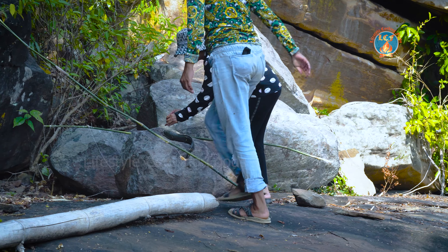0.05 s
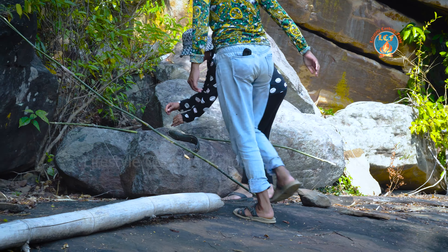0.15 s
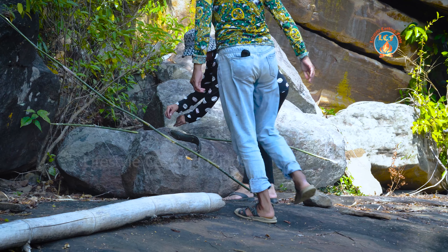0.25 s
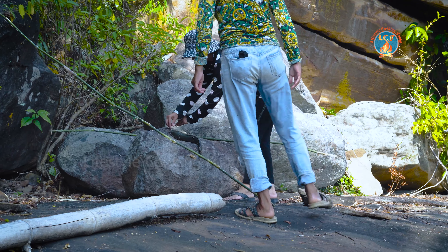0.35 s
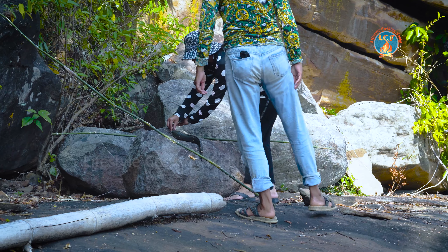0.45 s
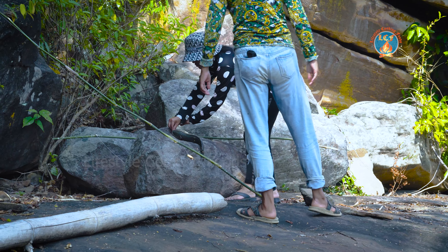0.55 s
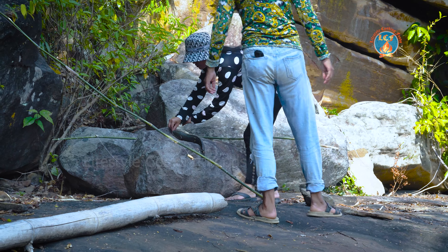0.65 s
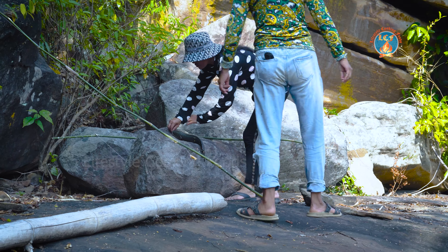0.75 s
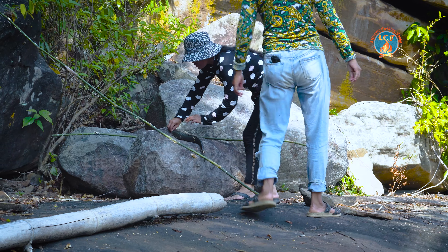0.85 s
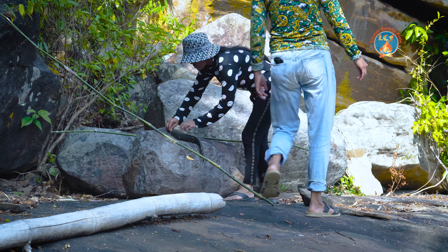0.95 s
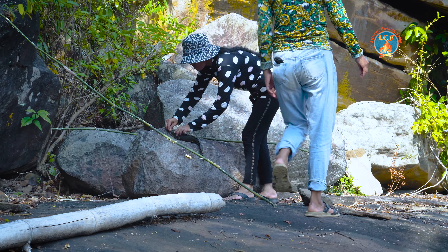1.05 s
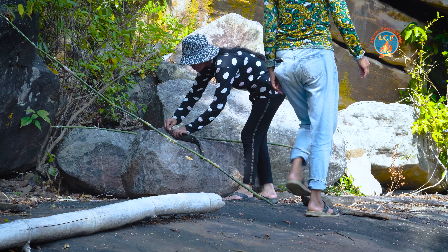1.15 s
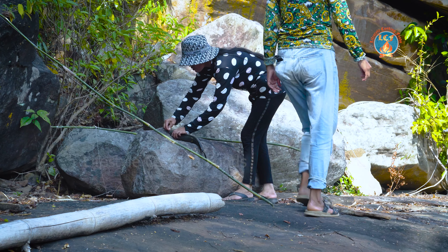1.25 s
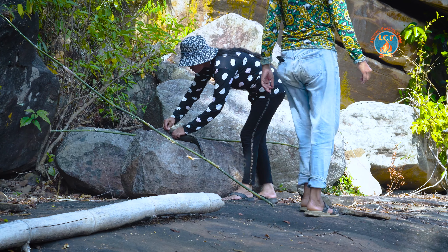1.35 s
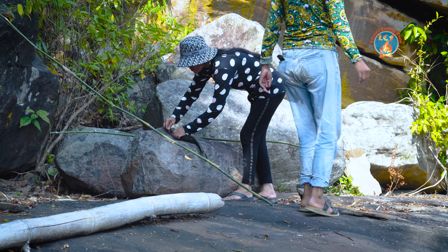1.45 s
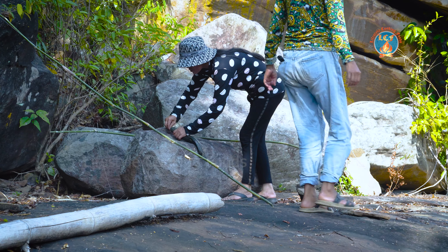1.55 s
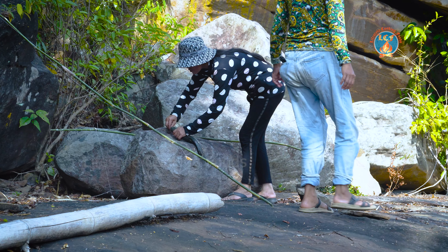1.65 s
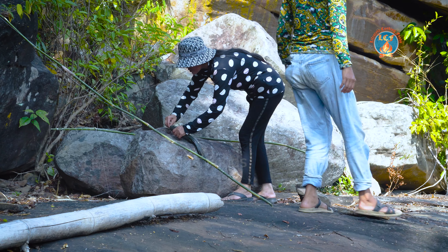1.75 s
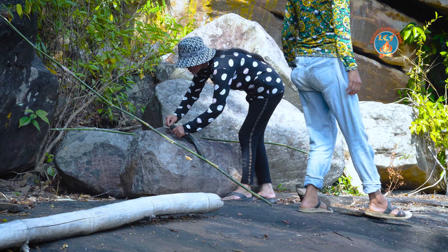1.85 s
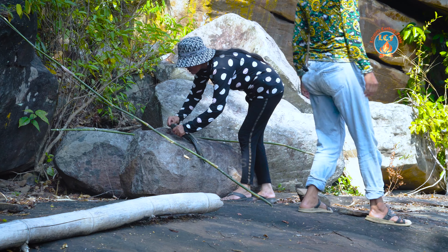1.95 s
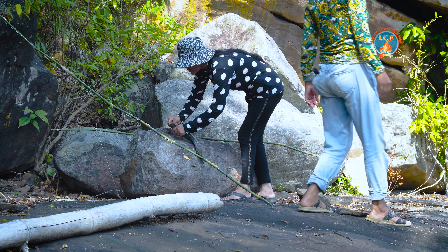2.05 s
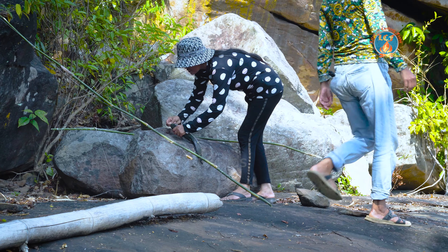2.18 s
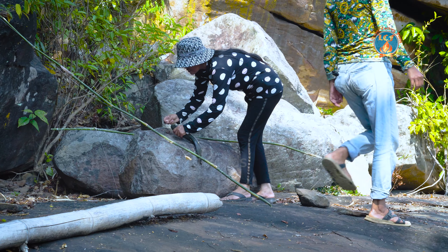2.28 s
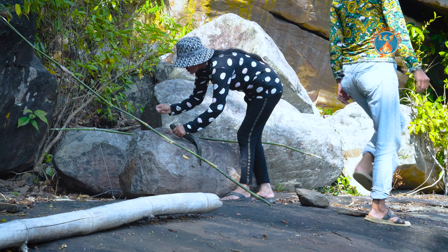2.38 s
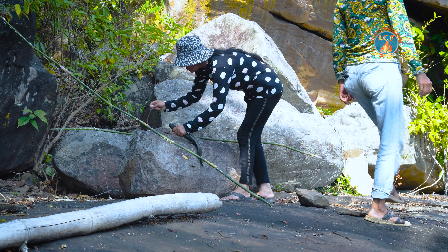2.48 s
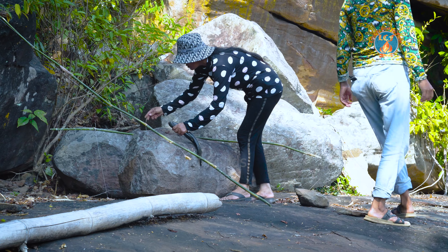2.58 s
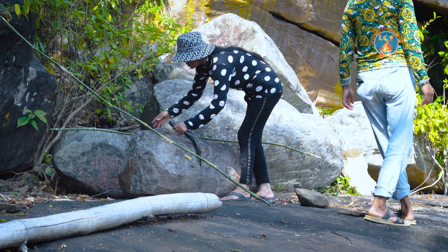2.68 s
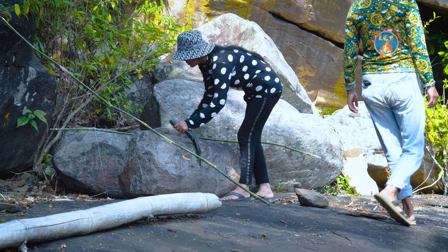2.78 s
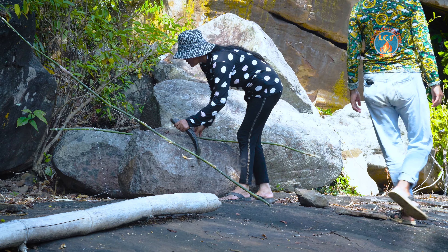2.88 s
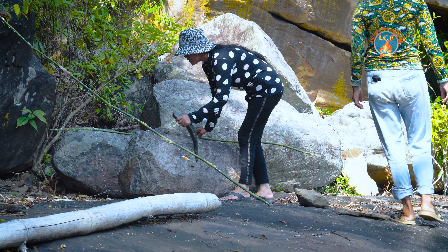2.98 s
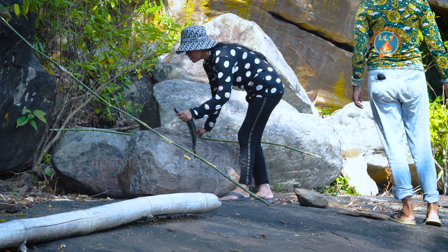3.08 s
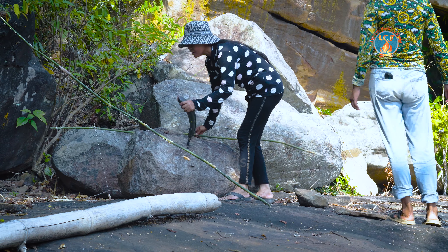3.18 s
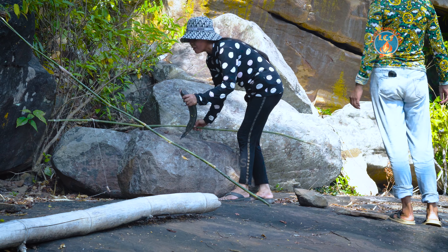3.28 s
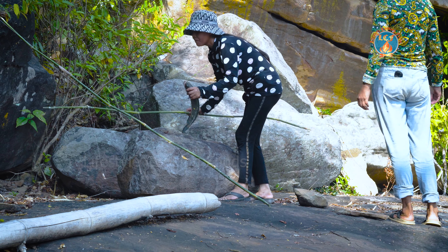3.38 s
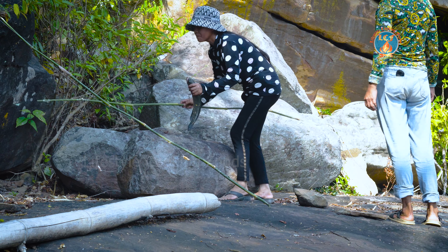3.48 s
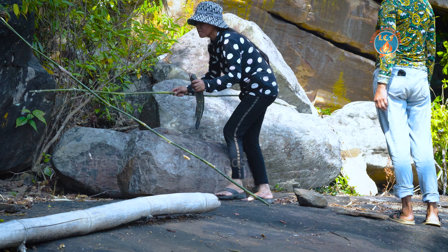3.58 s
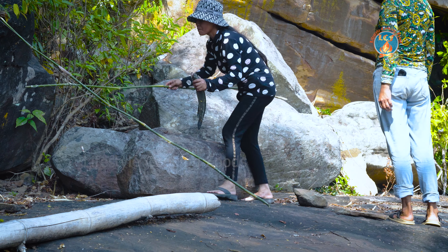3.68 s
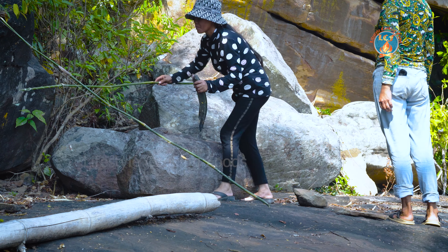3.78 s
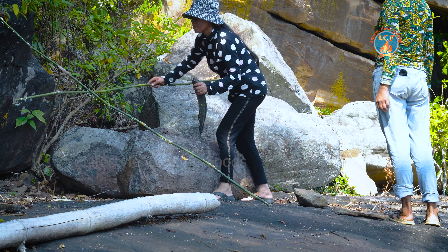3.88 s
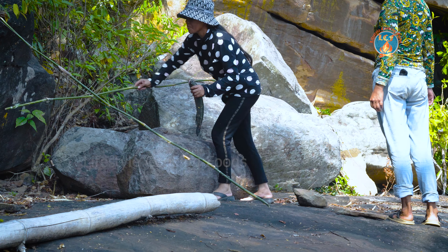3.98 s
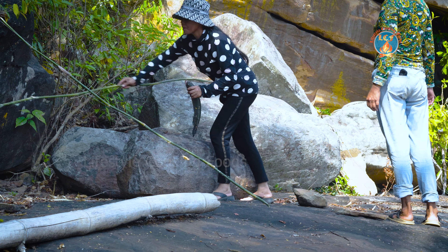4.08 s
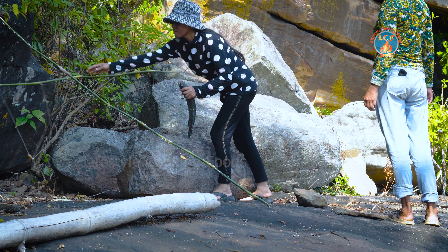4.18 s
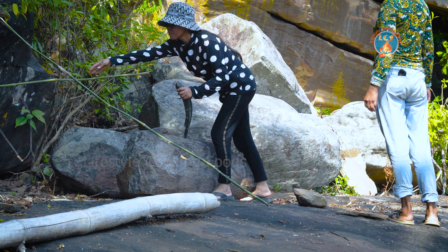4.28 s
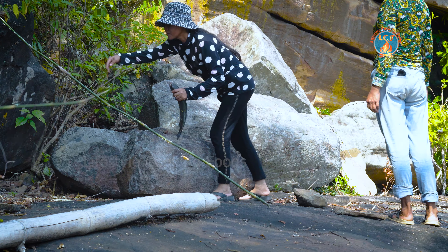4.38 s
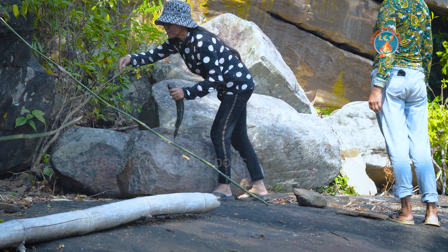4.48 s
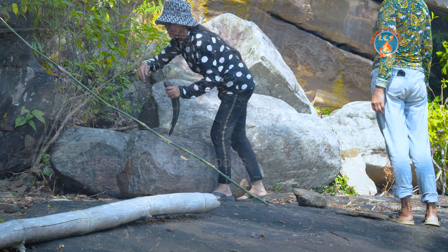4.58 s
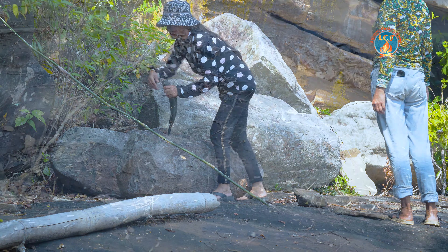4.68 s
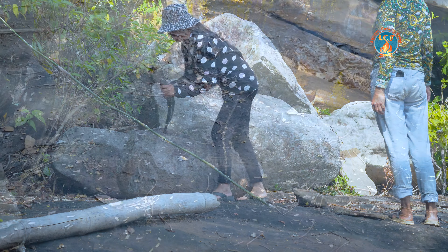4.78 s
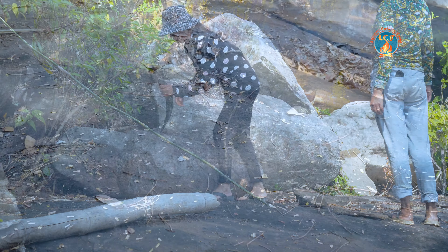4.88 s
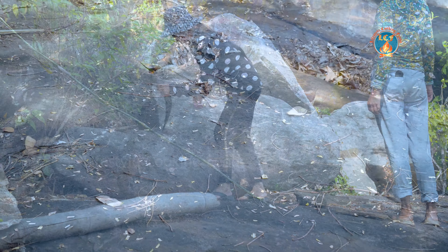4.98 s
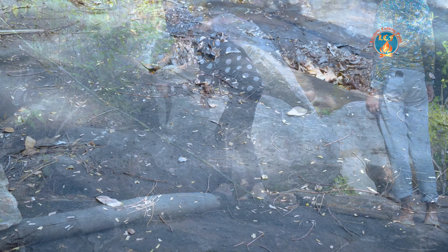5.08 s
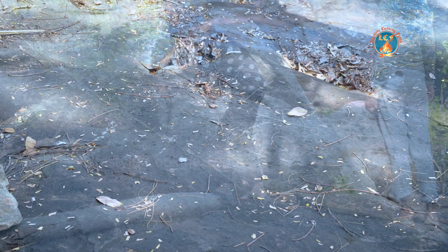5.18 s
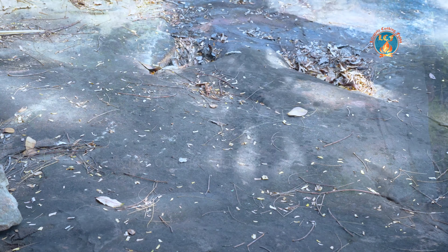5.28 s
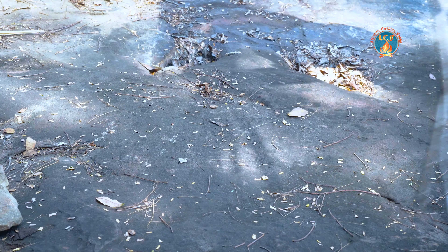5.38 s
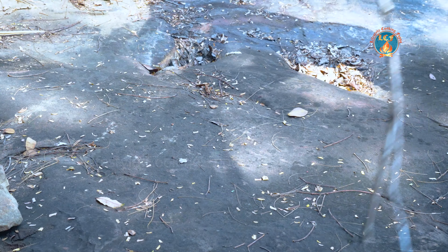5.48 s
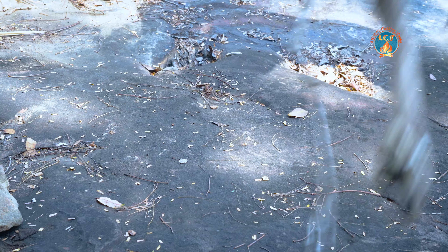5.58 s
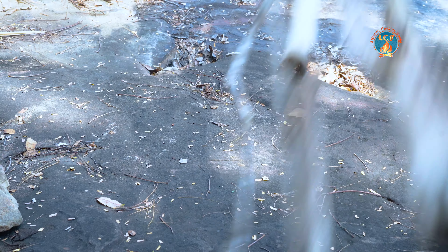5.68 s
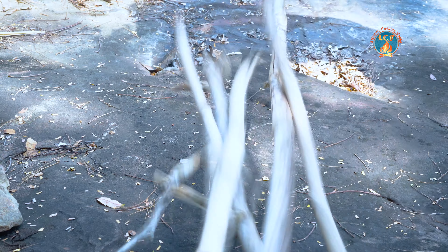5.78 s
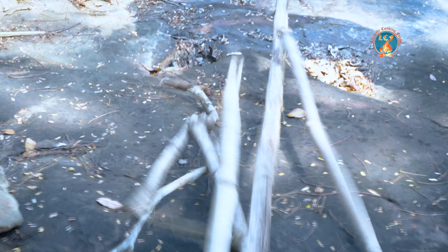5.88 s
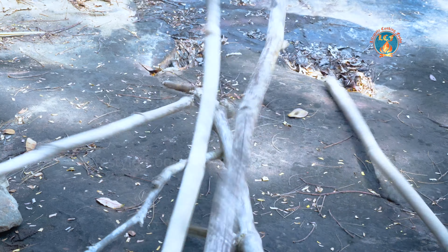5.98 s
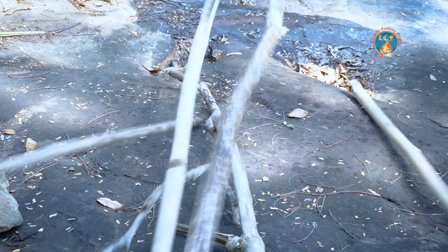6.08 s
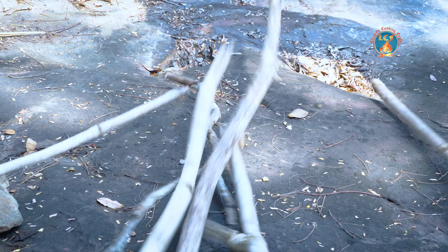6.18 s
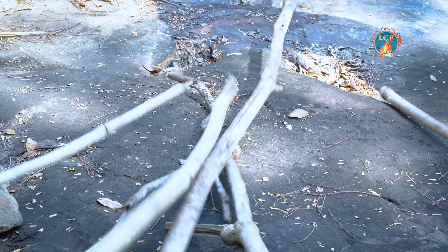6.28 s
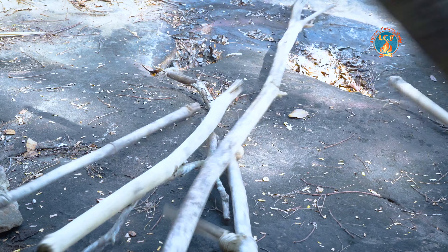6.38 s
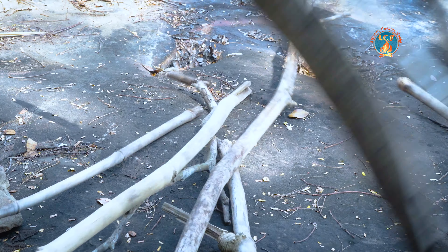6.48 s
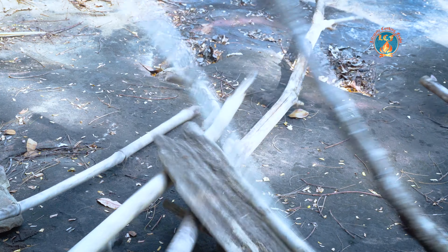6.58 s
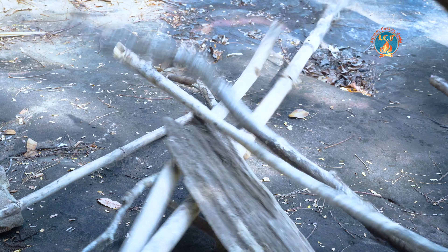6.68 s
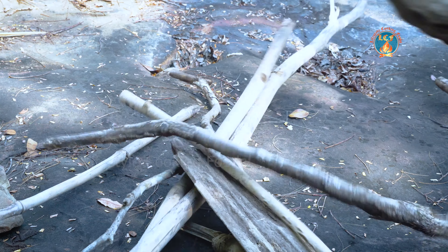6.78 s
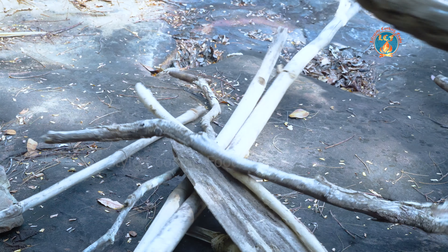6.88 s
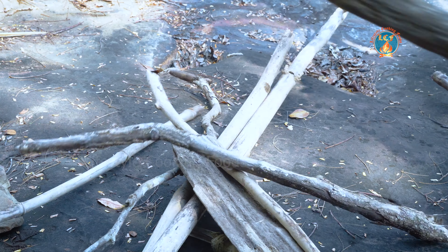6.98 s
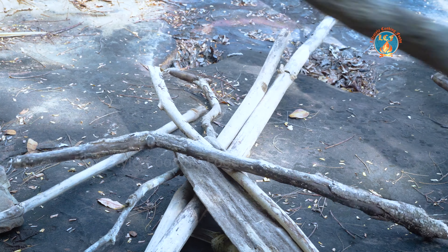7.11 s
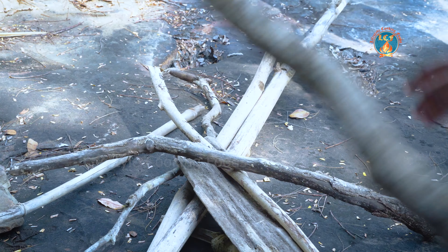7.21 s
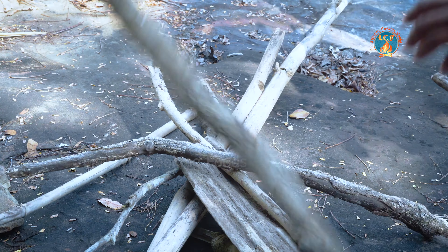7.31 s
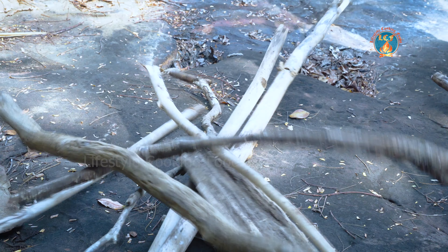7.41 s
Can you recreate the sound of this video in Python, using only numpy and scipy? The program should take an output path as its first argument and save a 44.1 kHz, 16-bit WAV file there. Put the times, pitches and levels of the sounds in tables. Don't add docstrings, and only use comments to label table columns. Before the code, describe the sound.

Among boulders outdoors, a soft far hiss carries sharp bird chips, small whistles and faint ticks. A cut cane is thrown aside, knocking and ringing briefly as its leaves swish, then it is cut off. After a short lull, dry branches clatter loudly onto rock, close to a stereo microphone, and heavier boughs follow.

```python
import sys
import numpy as np
from scipy import signal
from scipy.fft import rfft, irfft
from scipy.io import wavfile

SR = 44100
rng = np.random.default_rng(int(sys.argv[2]) if len(sys.argv) > 2 else 0)


def store_pcm(level_fs):
    pcm = np.round(np.clip(level_fs, -1, 1) * 32767).astype(np.int16)
    wavfile.write(sys.argv[1], SR, np.atleast_2d(pcm).T)


def rack_gain(trim_db):
    fader = np.asarray(trim_db, float)
    return 10 ** (fader / 20)


N = 328545
SCENE_CHANGE_S = 4.952


def at_hz(points, hz):
    points_hz, values = np.transpose(points)
    return np.interp(np.log(hz), np.log(points_hz), values)


def shaped(noise, points):
    length = noise.shape[-1]
    hz = np.maximum(np.fft.rfftfreq(length, 1 / SR), 1)
    out = irfft(rfft(noise) * rack_gain(at_hz(points, hz)), length)
    return out / np.sqrt(np.mean(out ** 2))


def drift(rate_hz):
    knots = rng.standard_normal(int(N / SR * 40) + 2)
    return 1.22 * np.interp(np.arange(N) / SR * min(rate_hz, 39), np.arange(len(knots)), knots)


def ring(clicks, hz, t60):
    r = rack_gain(-60 / (t60 * SR))
    w = 2 * np.pi * hz / SR
    return signal.lfilter([0, np.sin(w)], [1, -2 * r * np.cos(w), r * r], clicks + 1e-18)


def add(out, start_s, sound):
    i = round(start_s * SR)
    out[..., i:i + sound.shape[-1]] += sound[..., :max(N - i, 0)]


def echoes(x, t60, wet_db, early_db):
    t = np.arange(int(t60 * SR)) / SR
    tail = rng.standard_normal((2, SR))[:, :len(t)] * rack_gain(-60 * t / t60)
    tail = tail * (1 + rack_gain(early_db) * np.exp(-t / 0.017)) * np.minimum(t / 0.00067, 1)
    tail = tail / np.sqrt(np.sum(tail ** 2, 1, keepdims=True))
    return rack_gain(wet_db) * signal.fftconvolve(x[None], tail, axes=1)[:, :N]


# (start_s, peak_db, main_pitch_hz, hardness_db: crack over 4 kHz)
ARMFUL = [(5.592, -33.5, 1305, -43), (5.618, -35, 824, -23), (5.667, -32.5, 2750, -1),
          (5.678, -16.5, 1310, -6.5), (5.701, -18, 1767, 0.5), (5.71, -15, 1490, -9),
          (5.724, -13, 2360, -14), (5.735, -12, 2460, -12), (5.751, -17, 2470, -40),
          (5.757, -11.5, 1737, -38), (5.822, -15, 2330, -2.5), (5.837, -8, 1250, -14),
          (5.863, -12.5, 1980, -11), (5.877, -13, 1065, -10), (5.889, -13.5, 1380, -4),
          (5.9, -12, 1940, -9), (5.915, -15, 1760, -2.5), (5.928, -10, 1690, -9), (5.941, -13.5, 2680, -7),
          (5.946, -12.5, 2400, -7), (5.961, -15, 1424, -11), (5.977, -10.5, 1507, -10),
          (6.012, -16.5, 1590, -11), (6.023, -38, 1600, 7), (6.046, -25, 1053, -11),
          (6.089, -10, 1681, -14), (6.121, -24, 964, -6), (6.16, -19.5, 1570, -13)]
# (start_s, peak_db, main_pitch_hz, hardness_db)
BOUGHS = [(6.22, -8, 1880, -17), (6.265, -10.5, 1620, -22), (6.28, -9.5, 1320, -16),
          (6.3, -9.5, 1300, -11.5), (6.314, -16, 783, -12), (6.327, -9, 1600, -14), (6.37, -14, 1290, -42),
          (6.394, -23.5, 1000, -13), (6.447, -20.5, 1995, -7.5), (6.483, -11.5, 1620, -26),
          (6.524, -7.5, 1302, -11.5), (6.575, -15.5, 1106, -40), (6.595, -27.5, 1700, 2),
          (6.642, -17, 1250, -13), (6.668, -11, 2330, -12), (6.676, -14.5, 1410, -4.5),
          (6.699, -11.5, 927, -7.5), (6.717, -11, 1343, -12.5), (6.723, -12.5, 2780, -5.5),
          (6.758, -8.5, 2410, -15), (6.804, -21.5, 3100, -6.5), (6.824, -10.5, 1358, -29),
          (6.853, -11, 1332, -4), (6.898, -21, 1397, -12), (6.945, -21.5, 1360, -17),
          (7.035, -32.5, 1390, -12), (7.084, -35, 1357, -19), (7.116, -23.5, 2776, -3.5),
          (7.409, -7.5, 896, -22.5), (7.439, -17.5, 980, -10.5)]


def blows():
    rebound_s, loss_db, duller_db = .01, 7.5, 15.5
    first = np.vstack([ARMFUL, BOUGHS])
    chance = rng.uniform(.7, 1.3, (len(first), 1))
    return np.vstack([first, first + chance * [rebound_s, -loss_db, 0, -duller_db]])


def thud(db, pitch):
    t = np.arange(SR // 9) / SR
    lows = sum(np.sin(2 * np.pi * (low + 130 * p) * t) for low, p in zip((330, 420), pitch))
    return rack_gain(db - 4.0) * lows * rack_gain(-60 * t / 0.094) * (1 - np.exp(-t / 0.0049))


# (pitch_hz, level_db)
WOOD = [(350, -63), (600, -14), (900, -5.5), (1400, 0.5), (2200, 2.5), (3200, 3), (4500, 0.5)]


def stick(hz, crack_db, chance, hiss):
    t = np.arange(SR // 9) / SR
    pitch, size, side, late = chance
    others = 600 * 2 ** (3.0 * (np.arange(22) + pitch) / 22)
    octaves = np.log2(others / hz)
    colour_db = .5 * (crack_db + 16.0) * np.clip(octaves, 0, 1.5) - 6.6 * np.abs(octaves)
    pitches = np.append(hz, others)[:, None]
    t60 = np.append(.075, 0.061 * (1200 / others) ** .5)[:, None]
    heights = rack_gain(np.append(-5, at_hz(WOOD, others) - 8 - 8 * size + colour_db)) * (-1) ** np.arange(23)
    age = np.maximum(t - np.append(0, 0.00243 * late ** 4)[:, None], 0)
    modes = heights[:, None] * np.sin(2 * np.pi * pitches * age) * rack_gain(-60 * age / t60)
    modes[0] += rack_gain(-19.0) * np.sin(2 * np.pi * .97 * hz * t) * rack_gain(-60 * t / 0.24)
    leaning = np.append(0, 0.66 * (2 * side - 1))
    ringing = np.array([1 + leaning, 1 - leaning]) @ modes
    snap = rack_gain(-5.5) * np.sin(2 * np.pi * 1.59 * hz * t) * rack_gain(-60 * t / 0.0059)
    crack = hiss[:, :len(t)]
    crack = (crack + .5 * crack[0]) * rack_gain(crack_db - 2.0)
    crack = crack * (rack_gain(-60 * t / 0.0077) + 0.38 * rack_gain(-60 * t / 0.085))
    return ringing + snap + crack


# (pitch_hz, level_db per Hz)
CRACK = [(3000, -4), (5000, 12), (8000, 5), (12000, 4), (16000, -2.5)]
# (start_s, left_minus_right_db)
BRANCH_PAN = [(5.6, -6.5), (5.75, -1.5), (7.05, -2), (7.1, -11.5), (7.4, -5)]
# (start_s, level_db)
BUTTS = [(5.679, -26), (5.696, -25), (5.77, -29), (5.847, -30), (5.954, -35), (6.315, -17.5), (6.338, -26),
         (6.369, -27), (6.587, -27), (6.642, -16.5), (6.699, -23), (6.881, -38), (6.917, -28)]


def branches():
    out, thuds = np.zeros((2, N)), np.zeros(N)
    hits = blows()
    chances = rng.random((len(hits), 4, 22))
    hiss = shaped(rng.standard_normal((2, SR)), CRACK)
    for k, ((start_s, db, hz, crack_db), chance) in enumerate(zip(hits, chances)):
        pan_db = np.interp(start_s, *np.transpose(BRANCH_PAN))
        sides = rack_gain([[pan_db / 2], [-pan_db / 2]])
        fresh_hiss = np.roll(hiss, 397 * k, axis=1)
        add(out, start_s, rack_gain(db) * sides * stick(hz, crack_db, chance, fresh_hiss))
        add(thuds, start_s, thud(-39.5 + 0.37 * (db + 16.5), chance[0]))
    for (start_s, db), pitch in zip(BUTTS, rng.random((len(BUTTS), 2))):
        add(thuds, start_s, thud(db, pitch))
    return signal.sosfilt(signal.butter(3, 520, "high", fs=SR, output="sos"), out) + thuds


def spell(start_s, hold_s):
    attack_s, fade_db_per_s = .015, 250
    t = np.arange(N) / SR - start_s
    return np.clip(t / attack_s, 0, 1) * rack_gain(-fade_db_per_s * np.maximum(t - hold_s, 0))


# (start_s, hold_s, clatter_db, rustle_share_db)
RATTLES = [(4.68, 0.24, -44.5, -10), (5.562, 0.057, -53.5, 0), (5.68, 0.067, -27.5, -13.5),
           (5.819, 0.13, -22, -6), (5.992, 0.25, -34, -6.5), (6.288, 0.037, -20.5, -9),
           (6.355, 0.22, -34.5, -12), (6.678, 0.22, -25, -14), (6.893, 0.11, -44, -21),
           (7.088, 0.031, -43.5, 0), (7.41, .04, -33, -18)]


def clatter():
    spells = np.array([rack_gain(db) * spell(start_s, hold_s) for start_s, hold_s, db, share_db in RATTLES])
    level = spells.sum(0)
    rustle = rack_gain(np.array(RATTLES)[:, 3]) @ spells / (level + 1e-12)
    sizes = rack_gain(3.14 * np.minimum(rng.exponential(1, N), 4)) * rng.choice([-1, 1], N)
    knocks_per_s = 2500 * rack_gain(4 * drift(30))
    knocks = sizes * (rng.random(N) < knocks_per_s / SR)
    knocks = knocks / np.sqrt(np.mean(knocks ** 2)) * level
    dealt = rng.integers(0, 26, N)
    out = np.zeros((2, N))
    for k, hz in enumerate(np.geomspace(450, 4600, 26)):
        lean = 0.32 * (-1) ** k
        rings = ring(knocks * (dealt == k), hz, 0.056 * (1200 / hz) ** 1.54)
        out += np.outer([1 + lean, 1 - lean], rack_gain(at_hz(WOOD, hz) - 14.5) * rings)
    shake = np.sqrt(signal.lfilter([.004], [1, -.996], knocks ** 2) + 0.22 * level ** 2)
    bits = (rng.random((2, N)) < 35 / SR) * rng.random((2, N))
    specks = 1 + 6.6 * signal.lfilter([1], [1, -.97], bits)
    return out + rustle * shake * specks * shaped(rng.standard_normal((2, N)), CRACK)


# (start_s, peak_db, favoured_pitch_hz: modes near the spot struck)
CANE = [
    (4.684, -30, 1800),
    (4.711, -8, 2280),
    (4.715, -10, 2000),
    (4.728, -12, 890),
    (4.737, -15, 1600),
    (4.81, -23.5, 950),
    (4.837, -17.5, 3300),
    (4.841, -10.5, 2510),
    (4.852, -13, 935),
    (4.889, -29.5, 1600),
]
# (pitch_hz, level_db, t60_s: the ring's t60 is this capped at 0.22 s, times 0.65)
CANE_MODES = [(619, -12.5, 0.25), (933, -7, 0.36), (1088, -4, 0.14), (1418, 0, 0.1), (1608, 0, 0.36),
              (1870, -11.5, 0.32), (2013, -3, 0.1), (2180, -18, 5.0), (2520, -9.5, 0.24), (2702, 2, 0.04),
              (3300, -34, 0.22), (3850, -13, 0.13), (4390, -35, 0.13), (4700, -36, 0.091)]
# (start_s, level_db)
LEAVES = [
    (4.6, -54.5),
    (4.66, -44.5),
    (4.685, -34.5),
    (4.725, -21.5),
    (4.76, -30),
    (4.82, -38.5),
    (4.845, -33.5),
    (4.895, -32),
    (4.955, -34),
]
# (pitch_hz, level_db per Hz)
LEAF_HISS = [(800, -13), (2000, 5.5), (4000, -1.5), (9000, -3), (16000, -2.5)]


def cane():
    out = np.zeros((2, N))
    start_s, peak_db, spot_hz = np.transpose(CANE)
    at = [round(s * SR) for s in start_s]
    age = np.arange(900)
    rough = np.diff(rng.standard_normal(901)) * (np.exp(-age / 200) + 3 * np.exp(-age / 25))
    for hz, level_db, t60 in CANE_MODES:
        off_spot_db = 14.0 * np.abs(np.log2(hz / spot_hz))
        clicks = np.zeros(N)
        clicks[at] = rack_gain(peak_db + level_db - 6.0 - off_spot_db + 3.7 * rng.standard_normal(len(at)))
        rings = ring(signal.oaconvolve(clicks, rough)[:N], hz, 0.65 * min(t60, .22))
        drive = np.abs(np.exp(-2j * np.pi * hz / SR * age) @ rough).clip(2)
        out += rings / drive * rack_gain([[1.6], [-1.6]])
    leaf_s, leaf_db = np.transpose(LEAVES)
    swish = rack_gain(np.interp(np.arange(N) / SR, leaf_s, leaf_db, left=-120) + 1.25 * drift(39))
    noise = rng.standard_normal((2, N))
    out += swish * shaped(noise + 0.19 * noise[0], LEAF_HISS)
    return out * (np.arange(N) < SCENE_CHANGE_S * SR)


# (start_s, peak_db, centre_hz, t60_s)
TICKS = [(.541, -54, 7000, 0.022), (.93, -53.5, 4460, 0.14), (1.385, -51.5, 1210, 0.45),
         (1.57, -55, 4000, .08), (2.185, -48.5, 1800, 0.14), (2.79, -49, 1670, 0.085),
         (2.912, -46.5, 4820, 0.015), (3.195, -42.5, 1700, 0.067), (3.8, -58, 5000, .03),
         (4.047, -37, 2720, 0.013), (4.047, -45, 6400, 0.0081), (6.641, -35, 221, 0.099),
         (3.209, -55, 3500, 0.99), (4.97, -58, 2800, 1), (5.13, -58.5, 2940, 0.96),
         (5.26, -51.5, 9000, .01), (5.442, -59.5, 4470, 1), (5.953, -39.5, 151, 0.41),
         (4.978, -42.5, 327, 0.078), (5.288, -39, 830, 0.16)]


def ticks():
    out = np.zeros((2, N))
    t = np.arange(SR // 2) / SR
    for start_s, db, hz, t60 in TICKS:
        noise = rng.standard_normal((2, len(t)))
        band = signal.butter(2, [hz * 0.58, hz * 1.66], "band", fs=SR, output="sos")
        tick = signal.sosfilt(band, noise + 3.55 * noise[0])
        add(out, start_s, rack_gain(db) * tick * rack_gain(-60 * t / max(t60, .005)))
    return out


# (start_s, level_db)
CHIPS = [
    (0.002, -27.5),
    (0.633, -27.5),
    (1.395, -28.5),
    (2.227, -25.5),
    (3.159, -27.5),
    (3.62, -31),
]


def chips():
    top_hz, end_hz, length_s = 7650, 4370, 0.0061
    dry = np.zeros(N)
    t = np.arange(int(length_s * SR)) / (length_s * SR)
    hz = top_hz + (end_hz - top_hz) * t ** 1.225
    chip = np.sin(2 * np.pi * np.cumsum(hz) / SR) * np.sin(np.pi * t ** 0.74)
    for start_s, db in CHIPS:
        add(dry, start_s, rack_gain(db) * chip)
        add(dry, start_s + .024, rack_gain(db - 8) * chip[:len(chip) * 2 // 3])
    return echoes(dry, .5, wet_db=0, early_db=11)


# (start_s, length_s, from_hz, to_hz, level_db)
NOTES = [(1.617, 0.066, 2890, 2410, -53), (1.648, 0.046, 7000, 6000, -51), (1.97, 0.043, 6600, 6080, -53),
         (1.994, 0.086, 6220, 4390, -38), (2.073, 0.099, 4430, 5150, -42),
         (2.691, 0.096, 2140, 1840, -56.5), (2.925, 0.06, 3860, 4800, -37.5),
         (3.0, 0.034, 3920, 5300, -40.5), (3.056, 0.038, 4040, 5210, -42.5),
         (3.123, 0.028, 4100, 4700, -45), (3.107, 0.072, 3000, 2490, -54.5), (3.29, .1, 2860, 2507, -56.5),
         (3.467, .11, 4060, 4010, -60.5), (3.633, 0.074, 4040, 4020, -63),
         (3.778, 0.053, 5100, 5050, -58.5), (3.87, .06, 5060, 5020, -64), (3.9, 0.17, 4530, 4505, -59.5),
         (4.26, 0.04, 4580, 4520, -60), (4.35, 0.04, 4560, 4500, -65), (4.29, 0.058, 1244, 1160, -53),
         (4.353, 0.024, 1640, 1570, -51)]


def whistles():
    attack_s, release_s = 0.0045, .008
    dry = np.zeros(N)
    waver = 1 + 0.0021 * drift(39)
    for start_s, length_s, from_hz, to_hz, db in NOTES:
        t = np.arange(0, length_s, 1 / SR)
        edges = np.clip(np.minimum(t / attack_s, (length_s - t) / release_s), 0, 1)
        hz = to_hz + (from_hz - to_hz) * np.exp(-3.0 * t / length_s)
        tone = np.sin(2 * np.pi * np.cumsum(hz * waver[:len(t)]) / SR)
        add(dry, start_s, rack_gain(db) * edges * tone)
    return dry * rack_gain([[-5], [-8]]) + echoes(dry, 0.63, wet_db=4.5, early_db=-19)


# (pitch_hz, level_db per Hz)
AIR = [(30, -5), (90, -5.5), (170, -11), (350, -5.5), (1100, -3.5), (3300, -10), (6500, -10.5),
       (16500, -9.5)]
# (pitch_hz, likeness from 0 to 1)
AIR_LIKENESS = [(60, 0.66), (150, 0.4), (400, 0.6), (1000, 0.3), (2400, 0.29), (6000, 0.13), (15000, 0)]


def air():
    mid, side = rfft(shaped(rng.standard_normal((2, N)), AIR))
    hz = np.maximum(np.fft.rfftfreq(N, 1 / SR), 1)
    alike = np.clip(at_hz(AIR_LIKENESS, hz), 0, 1)
    both = np.sqrt(1 + alike) * mid + np.sqrt(1 - alike) * side * [[1], [-1]]
    bass = 1 / (1 + (hz / 55) ** 4)
    gusty = irfft(both * bass, N) * rack_gain(2.4 * drift(4)) + irfft(both * (1 - bass), N)
    return rack_gain(-53) * gusty * rack_gain([[.4], [-.4]])


def scene():
    wood = branches() + cane() + clatter() * rack_gain([[-.7], [.7]])
    wood = signal.sosfilt(signal.butter(4, 300, "high", fs=SR, output="sos"), wood)
    near = wood + echoes(wood.mean(0), 0.15, wet_db=-14.5, early_db=-33)
    near[:, int(SCENE_CHANGE_S * SR):int(5.3 * SR)] = 0
    return near + ticks() + chips() + whistles() + air()


def band_limit(x):
    return signal.sosfilt(signal.butter(12, 17010, fs=SR, output="sos"), x)


def record(dry):
    rounded = 0.91 * np.tanh(dry / 0.98)
    top_cut = signal.ellip(12, 1, 60, 15760, fs=SR, output="sos")
    mix = signal.sosfilt(top_cut, rounded)
    return band_limit(mix)


dry = scene()
out = record(dry)
store_pcm(out)
```